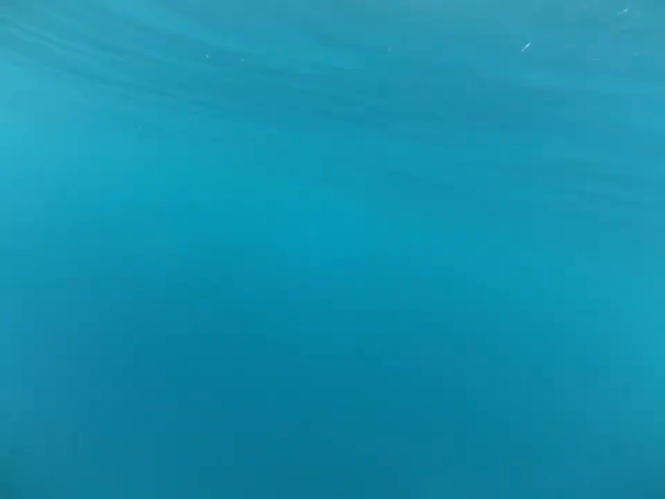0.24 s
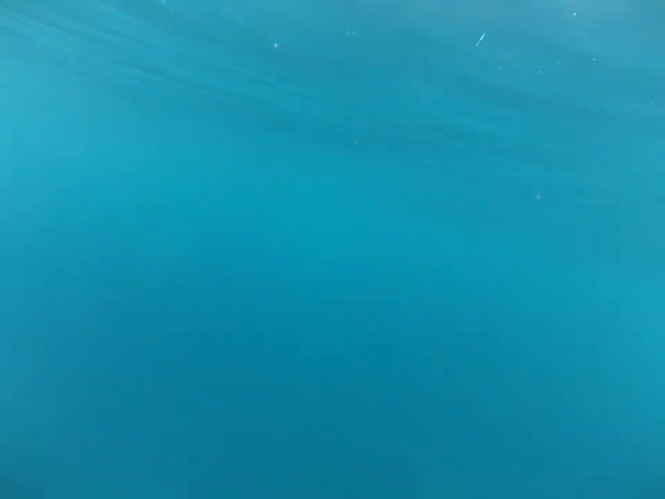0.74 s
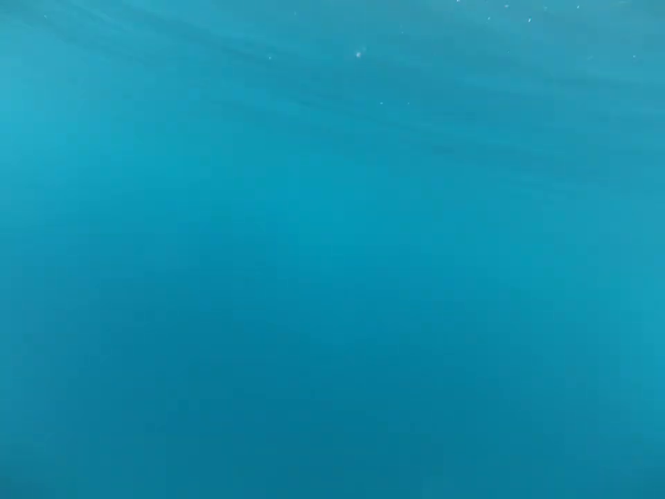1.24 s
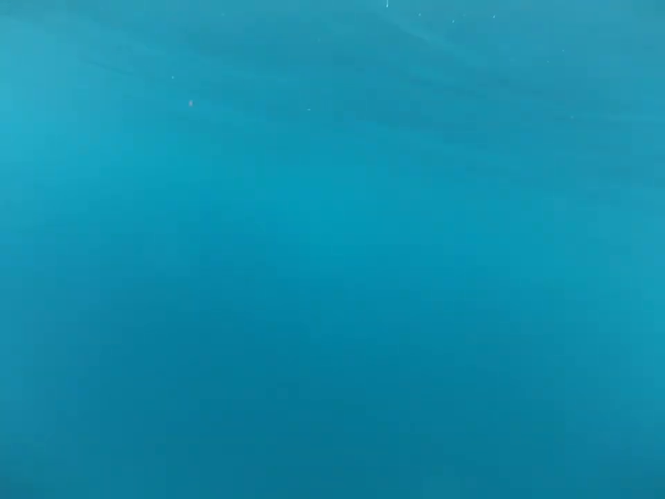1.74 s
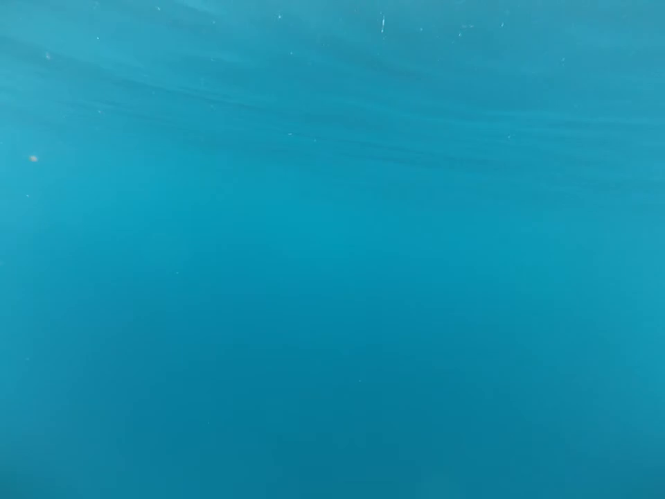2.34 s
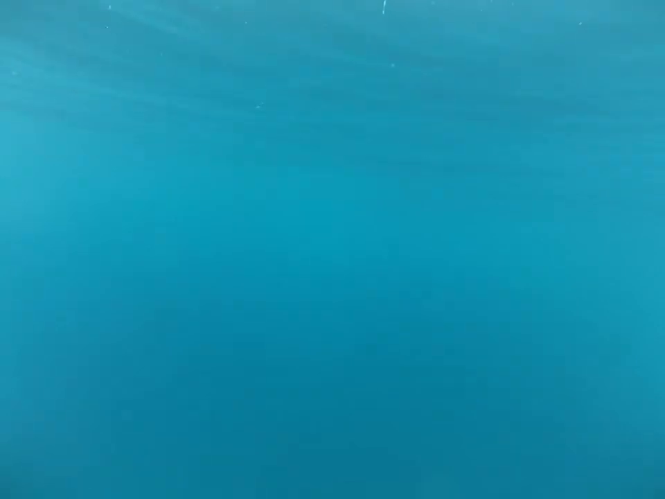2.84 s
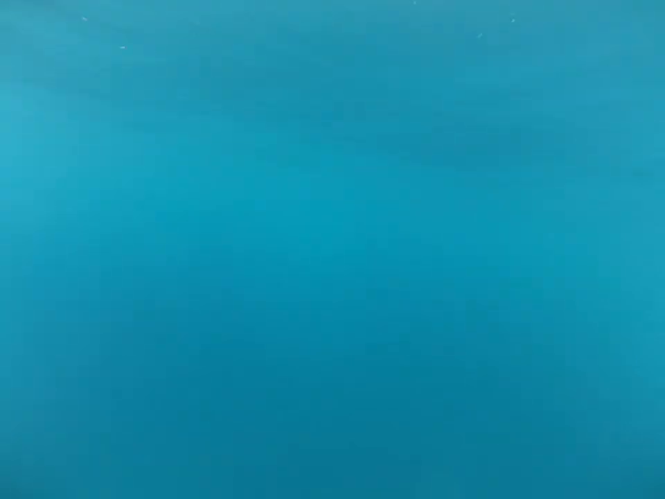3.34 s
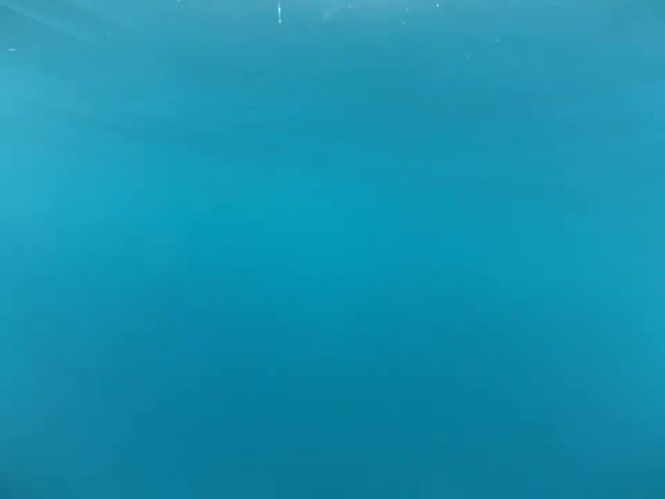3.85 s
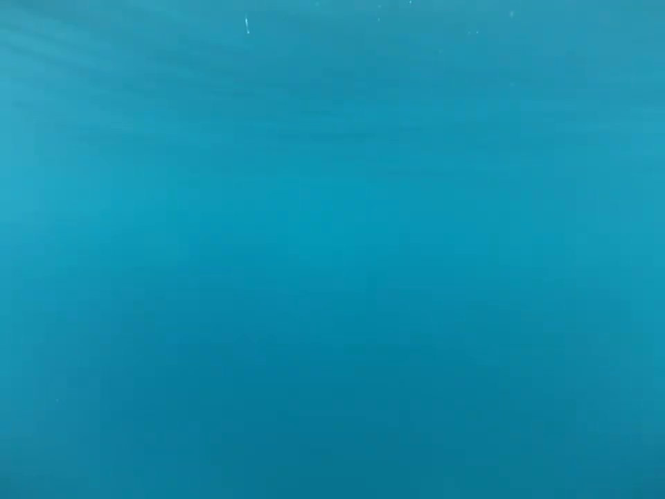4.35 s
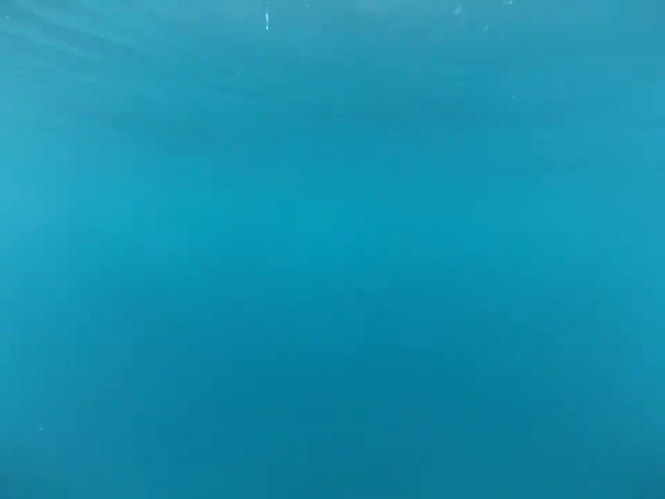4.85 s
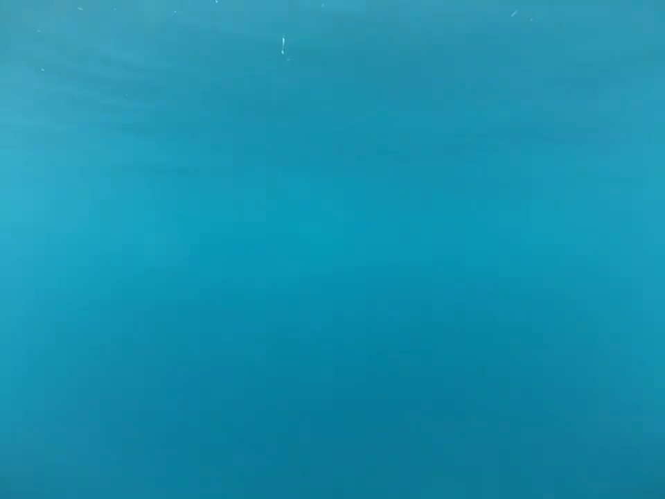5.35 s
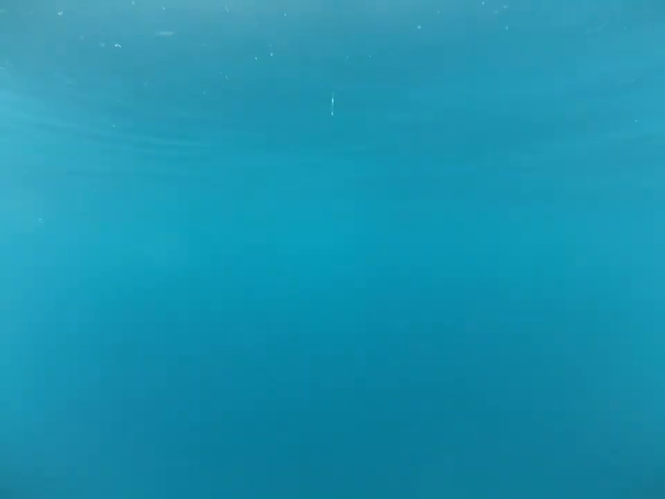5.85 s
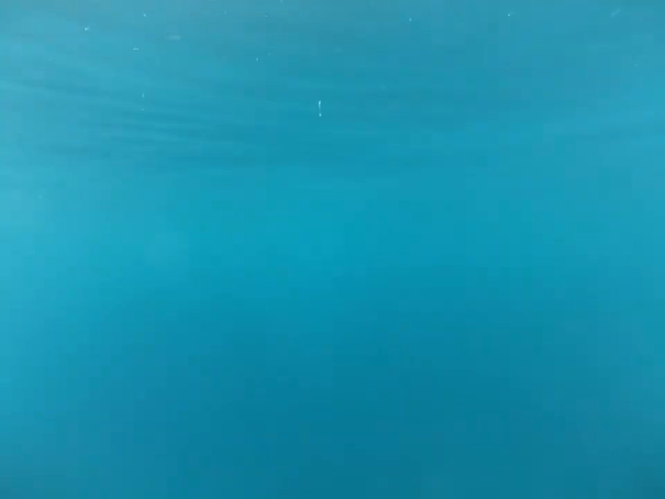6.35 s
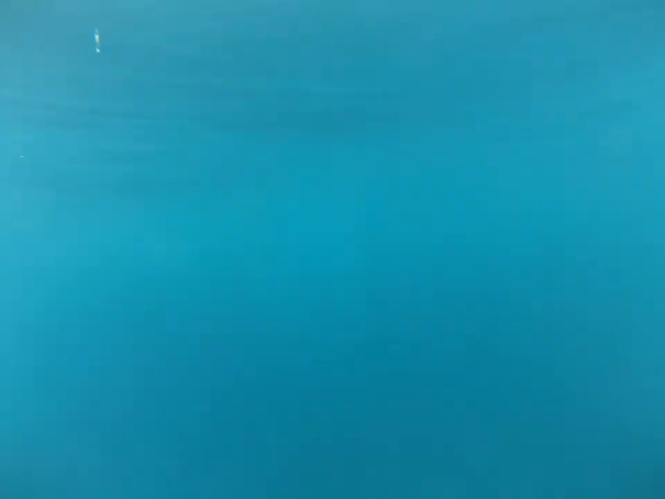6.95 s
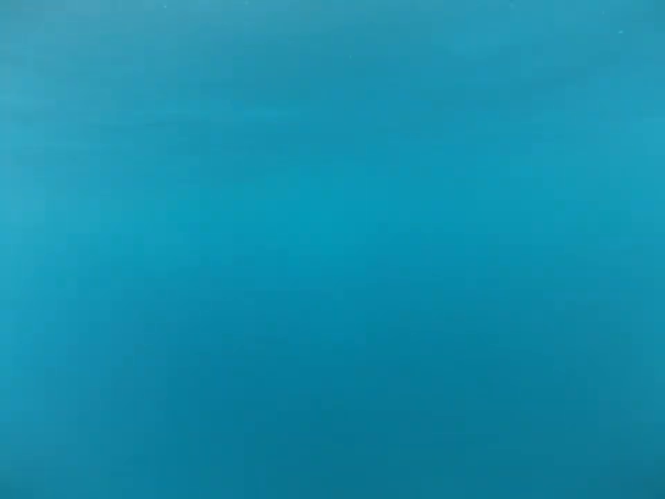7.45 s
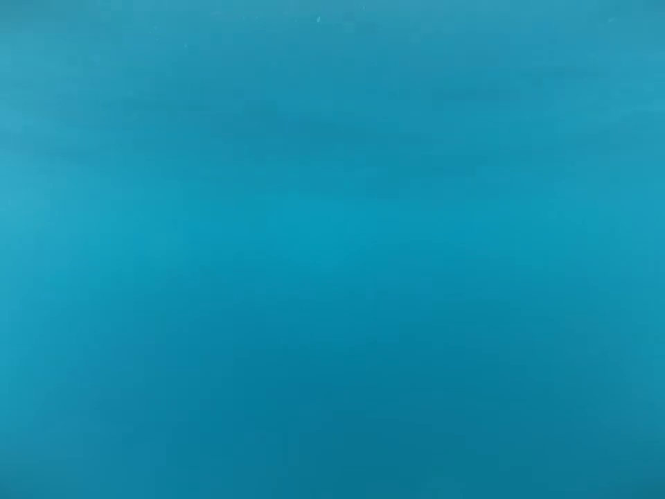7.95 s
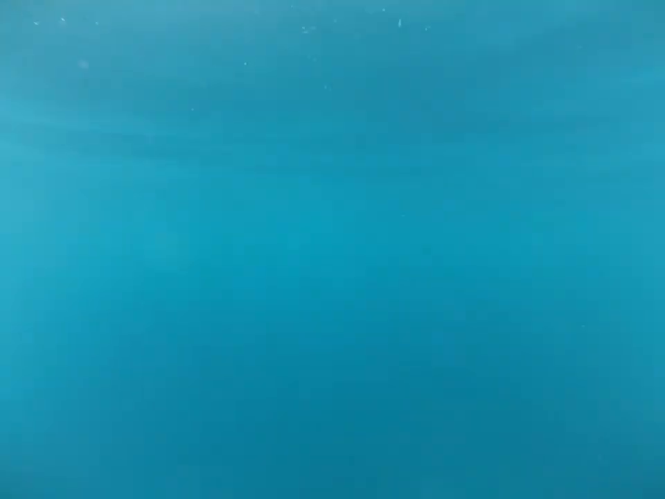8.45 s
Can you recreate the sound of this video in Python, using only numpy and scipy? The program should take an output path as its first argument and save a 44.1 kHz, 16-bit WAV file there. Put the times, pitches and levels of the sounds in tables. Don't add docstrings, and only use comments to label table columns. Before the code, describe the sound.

A sealed camera just under the sea surface hears a nearby boat engine idling: rapid, hollow, slightly uneven knocking with a constant low hum. Deep rumble surges irregularly as water rolls round the case. Small snaps crackle throughout, and faint high motor ticks come in brief bursts. A few bubbles blip early; near the middle a distant animal moans once, then a sharper bubble plop follows.

```python
import sys
import numpy as np
from scipy import signal
from scipy.fft import rfft, irfft, next_fast_len
from scipy.io import wavfile
from scipy.ndimage import uniform_filter1d, map_coordinates

SR = 44100
rng = np.random.default_rng(int(sys.argv[2]) if len(sys.argv) > 2 else 0)


def how_loud(loudness_db):
    steps = np.asarray(loudness_db, float) / 20
    return 10 ** steps


def digitize_waveform(pressure):
    field = np.atleast_2d(pressure).T
    bounded = np.clip(field, -1, 1)
    quanta = np.round(bounded * 32767).astype(np.int16)
    wavfile.write(sys.argv[1], SR, quanta)


N = 383229
TIME = np.arange(N) / SR

CYCLE_HZ = 8.312
# (time [s], lag [ms])
CRANK_LAG = [(0, 0), (.3, 1.2), (.8, .9), (1.26, -3), (1.7, .7), (2.2, -2.4), (2.7, .8), (3.85, 2.8),
             (4.4, 1.3), (4.7, 2.2), (5.0, 0), (5.35, .7), (6.0, -1), (6.65, .8), (7.1, -3.6), (7.6, -1.8),
             (8.2, 1.7), (8.7, 1)]
# (frequency [Hz], width [Hz], level [dB])
HOUSING_MODES = [
    [(423, 175, -29), (507.7, 156, -18.5), (609, 155, -18.5), (655, 216, -23)],
    [(747, 203, -42.5), (871.3, 130, -31), (1026.7, 217, -35)],
    [(1286, 347, -41)],
    [(1681.4, 271, -41.5), (1902, 313, -33.5)],
    [(2326, 665, -49), (2900, 660, -50.5), (3810, 430, -54)],
    [(4920, 1020, -62), (7200, 1100, -61)],
]
# (frequency [Hz], width [Hz], level [dB])
SIDE_RING = [(1490, 295, -1)]
# (frequency [Hz], width [Hz], depth [0-1])
SHELL_GAPS = [(1095, 57, 1), (1360, 63, 0.7), (2203, 70, 0.5), (2602, 140, 0.77), (3760, 160, 1)]
FIRING_MS = np.array([9.5, 30, 50.5, 71, 89.5, 108.5])
CREST_DELAY_MS = [0, .5, 2.5, 0, -.5, -1]
FIRING_DB = [
    [6, -1.5, -8.5, -6, -1, -3],
    [7, -4, -0.5, 0, 4.5, 5.5],
    [1, 8.5, 7, 7, 15, 5],
    [-1.5, 15.5, 4.5, 11.5, 9, 4],
    [-8, 11.5, 0, 5, 6.5, 12.5],
    [-16, 5, -14, 1, -4, 5],
]
# (time in the cycle [ms], level over the hull noise [dB])
VALVES = [
    [(36, 1), (104, 1.5), (115, 0)],
    [(75, 0), (103, 0)],
    [(105, -2)],
    [(34, 6), (40, 1), (95, 4), (117, 3)],
    [(4, 4), (36, 11), (82, 3), (96, 4), (113, 4)],
    [(104, 7)],
]
RATTLE = [.1, .25, .08, .06, .45, .6]
# (frequency [Hz], length [ms])
BURSTS = [(600, 15), (900, 5), (1280, 11), (1700, 8), (2900, .8), (7250, 3)]
NEARING_DB_PER_S = [0.16, 0.027, 0.11, 0.18, 0.23, .01]
SWELL_S, CREST_S = 2.48, 2.26
SIDE_DB, SIDE_SWING_DB, TOP_SWING_DB = -58.5, 2, 0.25

HUM_HZ = 81.93
HUM_ORDERS = [3, 5, 6, 7, 8, 10, 11, 12, 15, 28, 30]
HUM_DB = [-45, -50.5, -60, -49.5, -53, -64.5, -64, -62, -66.5, -85, -74]
HUM_DRIFT = [0, .4, 0, -.8, 0, 0, 0, 0, 0, 0, 0]

# (frequency [Hz], level [dB per Hz])
RUMBLE = [(8, -47), (18, -8.5), (26, -3.5), (33, 1), (42, -4.5), (52, -9.5), (62, -25.5), (72, -36),
          (90, -53), (160, -120)]
# (frequency [Hz], level [dB per Hz])
WASH = [(30, -56), (60, 1.5), (85, 0), (125, 0.5), (155, -5), (180, -13), (210, -7), (300, -9), (400, -16),
        (900, -118)]
# (time [s], level [dB], half length [s])
RUMBLE_SURGES = [(0.05, -22, 0.065), (0.362, -18.5, 0.11), (0.604, -20, .06), (0.87, -20.5, 0.12),
                 (1.34, -18.5, .17), (1.613, -15.5, 0.023), (1.867, -17.5, 0.17), (2.124, -18, 0.07),
                 (2.41, -21, 0.18), (2.747, -15, 0.084), (2.962, -19, 0.04), (3.28, -16.5, 0.092),
                 (3.54, -18.5, 0.096), (3.764, -21, .07), (3.956, -19, 0.015), (4.13, -21, 0.12),
                 (4.477, -20.5, .1), (4.716, -18.5, .07), (4.96, -20, .07), (5.197, -19, 0.095),
                 (5.418, -19, 0.022), (5.66, -24, 0.12), (6.052, -19.5, 0.058), (6.392, -24, 0.15),
                 (6.707, -24.5, .08), (6.99, -26, 0.046), (7.365, -26, 0.13), (7.806, -23.5, 0.19),
                 (8.33, -19.5, 0.082), (8.64, -25, 0.096)]
CALM_DB, WASH_DB = -30.5, -39.5
WASH_FOLLOWS, GURGLE_DB = 0.14, 1

# (time [s], frequency [Hz], level [dB])
MOAN = [
    (4.2, 400, -56),
    (4.3, 424, -44),
    (4.41, 479, -37),
    (4.52, 492, -34.5),
    (4.62, 488, -36),
    (4.72, 467, -38),
    (4.85, 412, -46),
    (4.93, 368, -52),
    (5.06, 310, -55),
]
# (time [s], peak level [dB], frequency [Hz], 60 dB decay [s])
BUBBLES = [
    (0.443, -23, 225, 0.043),
    (.56, -29, 326, 0.047),
    (3.937, -26, 332, 0.031),
    (4.01, -29.5, 131, 0.11),
    (6.12, -18.5, 330, 0.035),
    (6.117, -24, 540, .025),
    (6.135, -13, 426, 0.013),
    (6.143, -19, 300, 0.024),
]
# (time [s], peak level [dB], brightness [dB])
SNAPS = [(0.1829, -36, -22), (0.5371, -48, -18), (0.616, -39, -21), (1.2589, -38, -22), (1.3079, -58, -12),
         (1.5627, -49, -9), (1.8015, -41, -10), (1.906, -45, -11), (2.093, -40, -23), (2.143, -35, -25),
         (2.6682, -50, -15), (2.684, -42, -15), (2.7271, -46, -13), (2.7759, -46, -20), (3.0159, -50, -10),
         (3.0928, -61, -18), (3.4086, -42, -25), (3.8926, -45, -12), (4.0456, -48, -18), (4.126, -40, -20),
         (4.2357, -41, -14), (5.412, -42, -17), (6.4801, -48, -20), (6.9001, -48, -6), (7.2942, -44, -19),
         (7.4698, -37, -24), (8.23, -50, -1.5), (8.252, -46, -16), (8.286, -44, -20), (8.6322, -40, -17)]

# (time [s], steps [count])
MOTOR_RUNS = [(.1385, 2), (.1671, 1), (.4484, 5), (.7362, 1), (.7501, 3), (1.0607, 1), (4.2958, 1),
              (4.302, 1), (4.3156, 1), (4.6647, 4), (5.0779, 4), (5.1765, 4), (5.2439, 1), (5.5546, 5),
              (5.8656, 1), (5.8806, 2), (6.1546, 5), (6.5651, 4), (6.8659, 4), (7.173, 4), (7.5683, 2),
              (7.5978, 1), (7.9248, 5), (8.1503, 2), (8.1814, 3), (8.5565, 5)]
STEP_S = 0.0122
# (time from the step [ms], frequency [Hz], level [dB], 60 dB decay [ms])
STEP_TICKS = [(-1.8, 13300, -48, 6), (-1.2, 12500, -51, 5), (-.5, 11650, -47.5, 7), (-1.4, 9500, -55, 7),
              (4, 9600, -51, 6), (7.5, 9700, -56, 7)]
# (time [s], frequency [Hz], level [dB])
WHINE = [(1.34, 4896, -84), (1.354, 4957, -69), (1.408, 4855, -71), (1.432, 5023, -71), (1.474, 4888, -68),
         (1.49, 4740, -80)]
# (frequency [Hz], level [dB per Hz])
HISS = [(500, -29), (3000, 11.5), (4500, -2.5), (5500, 4), (6400, 0), (7300, 2), (8500, 1), (10000, -0.5),
        (13500, -1.5), (14300, -6), (15600, -10), (17000, -45)]


def engine():
    lag_s = curves(CRANK_LAG)[0] / 1000
    swell = np.cos(2 * np.pi * (TIME - CREST_S) / SWELL_S)
    from_middle = TIME - TIME.mean()
    firing_turn = 2 * np.pi * 6 * CYCLE_HZ * (TIME - lag_s)
    out = how_loud(-31.5 + 0.58 * wobble(2.61)) * np.sin(firing_turn)
    for k, group in enumerate(HOUSING_MODES):
        firings = list(zip(np.add(FIRING_MS, CREST_DELAY_MS[k]), FIRING_DB[k]))
        drive = knocks(firings + list(VALVES[k]), group, RATTLE[k], BURSTS[k], lag_s)
        drive = drive * how_loud(NEARING_DB_PER_S[k] * from_middle)
        out += filtered(drive, modes(group)) * how_loud(-TOP_SWING_DB * swell * (k == 4))
        if k == 3:
            out -= how_loud(SIDE_DB + SIDE_SWING_DB * swell) * unit(filtered(drive, modes(SIDE_RING)))
    return filtered(out, shell_gaps)


def knocks(pattern, group, rattle, burst, lag_s):
    burst_hz, burst_ms = burst
    size = int(burst_ms * SR / 1000)
    shape = np.hanning(size) * np.sin(2 * np.pi * burst_hz * np.arange(size) / SR)
    click = filtered(np.eye(1, SR // 8)[0], modes(group))
    ring = np.abs(signal.hilbert(np.convolve(click, shape)))

    ms, db = np.transpose(pattern)
    cycles = np.arange(int(N / SR * CYCLE_HZ))[:, None] / CYCLE_HZ
    when = cycles + ms / 1000 + rng.normal(0, 0.0004, (len(cycles), len(ms)))
    when = np.abs(when + np.interp(when, TIME, lag_s) - ring.argmax() / SR)
    force = how_loud(db + rng.normal(0, 1.2, when.shape))
    blows = np.bincount((when.ravel() * SR).astype(int), force.ravel(), N)[:N]

    loose = signal.oaconvolve(blows, np.hanning(SR // 120))[SR // 500:][:N]
    shake = how_loud(-1.5 + 0.8 * wobble(6)) + rattle * loose
    crest = np.sqrt(2) * np.linalg.norm(click) / ring.max()
    return shake * rng.standard_normal(N) + crest * signal.oaconvolve(blows, shape)[:N]


def modes(rows):
    def response(f):
        total = 0
        for k, (c, w, db) in enumerate(rows):
            once = 1j * f * w / (c * c - f * f + 1j * f * w)
            total = total + (-1) ** k * how_loud(db) * once ** 3
        return total
    return response


def shell_gaps(f):
    return np.prod([1 - depth * 1j * f * w / (c * c - f * f + 1j * f * w) for c, w, depth in SHELL_GAPS], axis=0)


def camera_hum():
    turn = 2 * np.pi * HUM_HZ * TIME + 0.095 * wobble(3)
    out = np.zeros(N)
    for order, db, drift in zip(HUM_ORDERS, HUM_DB, HUM_DRIFT):
        level = how_loud(db + 5.5 + drift * (TIME - TIME.mean()) + 0.45 * wobble(4.5))
        out += level * np.sin(order * turn + rng.uniform(0, 2 * np.pi))
    return out


def water():
    power = how_loud(2 * CALM_DB)
    for s, db, half_s in RUMBLE_SURGES:
        power = power + how_loud(2 * db) * np.exp(-((TIME - s) / half_s) ** 2)
    surge = np.sqrt(power)
    rumble = noise(RUMBLE)
    own = np.sqrt(np.abs(uniform_filter1d(rumble ** 2, size=SR // 14)))
    rumble = unit(rumble / (own + 0.25))
    wash = unit(surge ** WASH_FOLLOWS * noise(WASH))
    return surge * rumble + how_loud(WASH_DB + GURGLE_DB * wobble(12)) * wash


def sea_life():
    out = glide_tone(MOAN, overtone_db=-23, unsteady=0.0007)
    for s, db, hz, t60 in BUBBLES:
        add(out, s, db + 4.5, hz, t60, rise=0.002, glide=0.082)
    for s, db, bright_db in SNAPS:
        add(out, s, db - 5, 7300, 0.003, rise=0.00013)
        add(out, s, db, 4300, 0.0012, rise=0.0001)
        crack = rng.standard_normal(SR // 500)
        out[int(s * SR):][:SR // 500] += how_loud(db + bright_db + 3) * crack
        add(out, s, db + bright_db + 10, 11500, 0.0008, rise=0.00004)
    far_level = how_loud(np.minimum(3.5 * rng.exponential(1, 1500), 14))
    far = np.bincount(rng.integers(0, N, 1500), far_level, N)
    return out + filtered(far, modes([(3850, 6400, -49), (7590, 2000, -45), (11800, 5000, -75)]))


def camera():
    out = glide_tone(WHINE, overtone_db=2, unsteady=0.0146) + how_loud(-65) * noise(HISS)
    for start, steps in MOTOR_RUNS:
        for s in start + STEP_S * np.arange(steps) + rng.normal(0, 0.00031, steps):
            for ms, hz, db, t60_ms in STEP_TICKS:
                tick_db, tick_hz = db + 4 + rng.normal(0, 1.5), hz * rng.normal(1, 0.01)
                add(out, s + ms / 1000, tick_db, tick_hz, t60_ms / 1000, rise=0.0008)
    return out


def glide_tone(rows, overtone_db, unsteady):
    hz, db = curves(rows)
    fade = np.clip(np.minimum(TIME - rows[0][0], rows[-1][0] - TIME) / 0.019, 0, 1)
    turn = 2 * np.pi * np.cumsum(hz * (1 + unsteady * wobble(360))) / SR
    return fade * how_loud(db + 4) * (np.sin(turn) + how_loud(overtone_db) * np.sin(2 * turn))


def add(track, s, db, hz, t60, rise, glide=0):
    t = np.arange(int(1.5 * t60 * SR)) / SR
    envelope = how_loud(db - 60 * t / t60) * (1 - np.exp(-t / rise))
    ring = envelope * np.sin(2 * np.pi * hz * (t + glide * t * t / t60))
    part = track[int(s * SR):][:len(t)]
    part += ring[:len(part)]


def noise(spectrum):
    f, db = np.transpose(spectrum)
    colour = lambda hz: how_loud(np.interp(np.log(hz + 1), np.log(f + 1), db))
    return unit(filtered(rng.standard_normal(N), colour))


def filtered(x, response):
    m = next_fast_len(len(x) + SR // 4, real=True)
    return irfft(rfft(x, m) * response(np.fft.rfftfreq(m, 1 / SR)), m)[:len(x)]


def wobble(rate):
    coarse = TIME[::16]
    knots = rng.standard_normal(int(N * rate / SR) + 4)
    return np.interp(TIME, coarse, map_coordinates(knots, [coarse * rate]))


def curves(rows):
    s, *cols = np.transpose(rows)
    return [np.interp(TIME, s, c) for c in cols]


def unit(x):
    return x / np.sqrt(np.mean(x ** 2) + 1e-20)


def scene():
    return (engine() + camera_hum() + water() + sea_life() + camera())[None]


def roll_off(x):
    return signal.sosfilt(signal.butter(12, 15570, fs=SR, output="sos"), x)


def record(dry):
    return roll_off(dry)


dry = scene()
out = record(dry)
digitize_waveform(out)
```